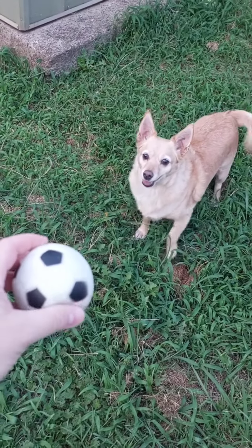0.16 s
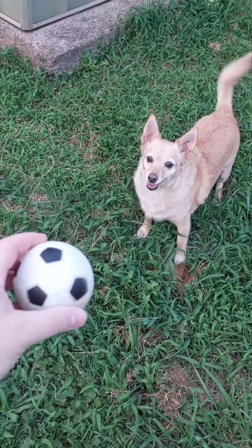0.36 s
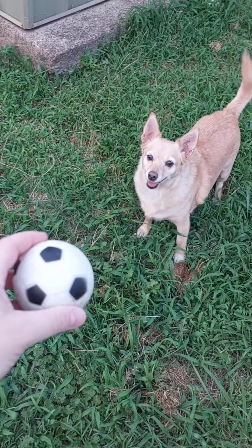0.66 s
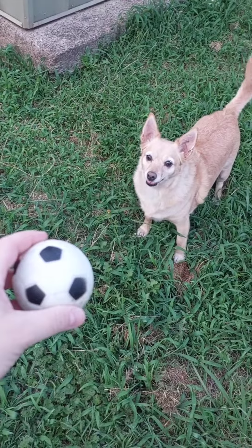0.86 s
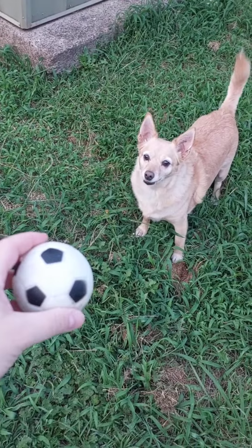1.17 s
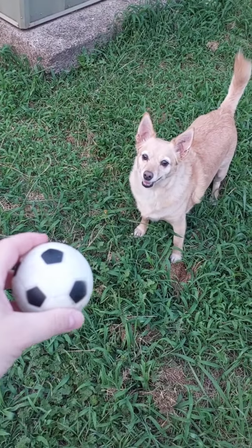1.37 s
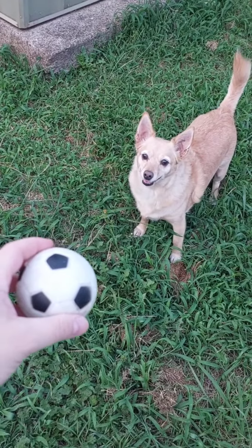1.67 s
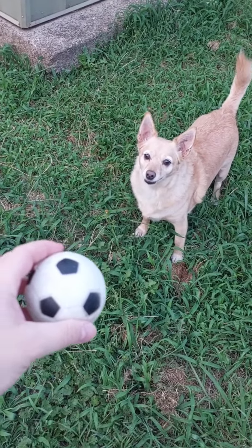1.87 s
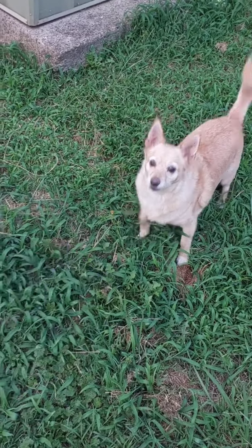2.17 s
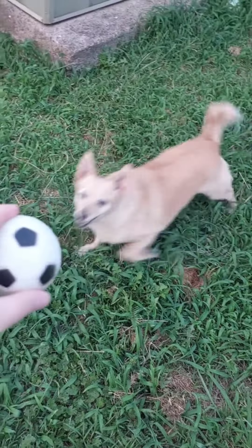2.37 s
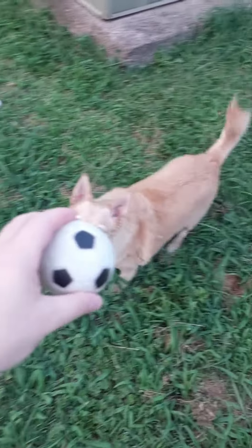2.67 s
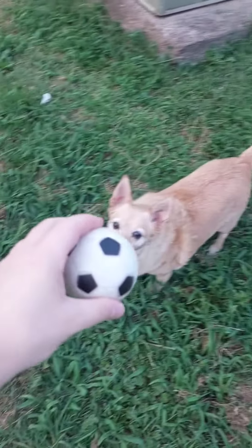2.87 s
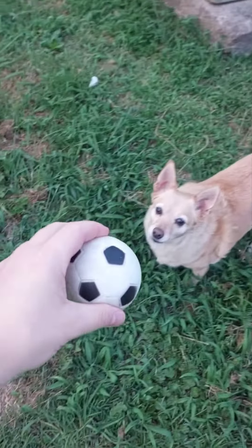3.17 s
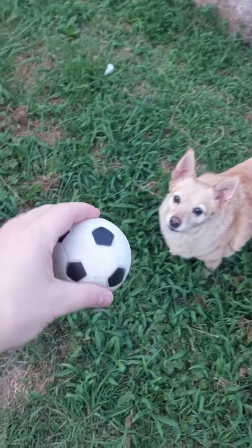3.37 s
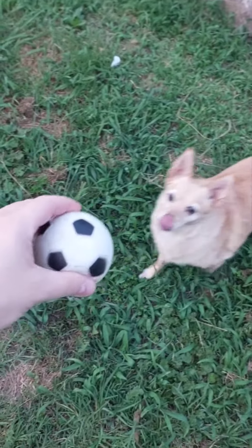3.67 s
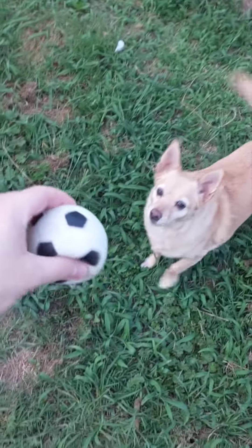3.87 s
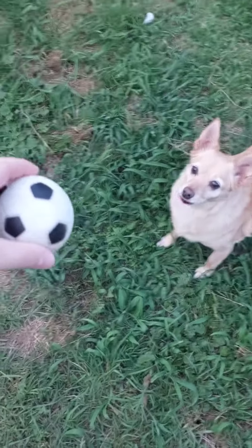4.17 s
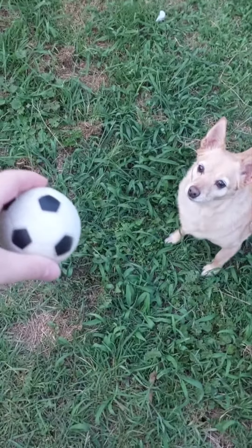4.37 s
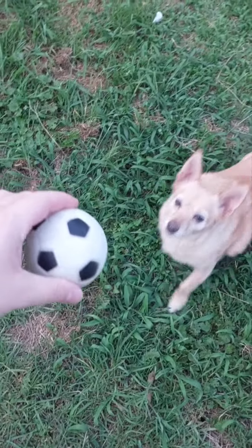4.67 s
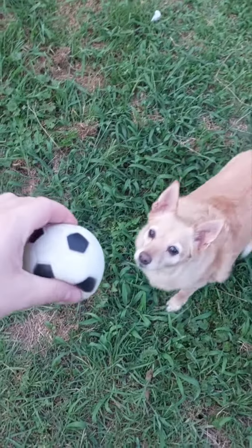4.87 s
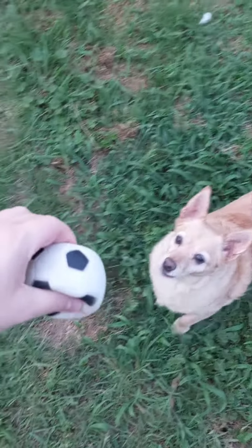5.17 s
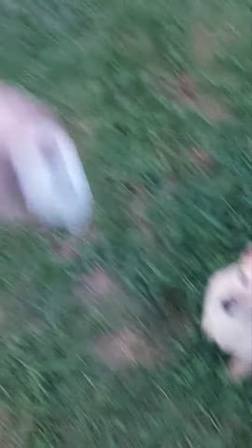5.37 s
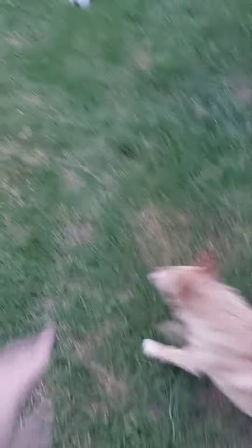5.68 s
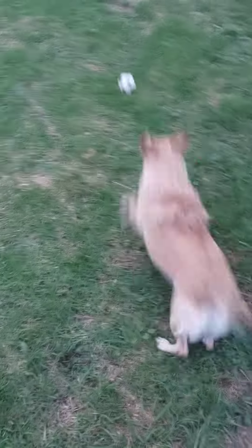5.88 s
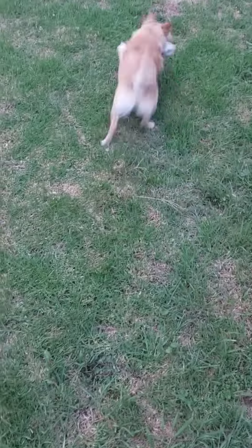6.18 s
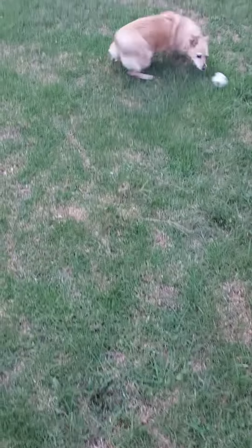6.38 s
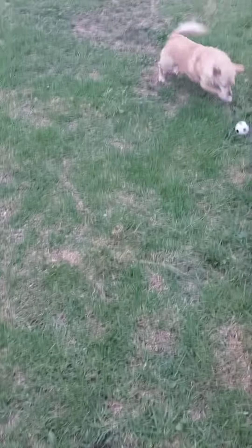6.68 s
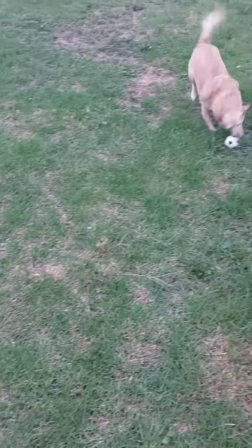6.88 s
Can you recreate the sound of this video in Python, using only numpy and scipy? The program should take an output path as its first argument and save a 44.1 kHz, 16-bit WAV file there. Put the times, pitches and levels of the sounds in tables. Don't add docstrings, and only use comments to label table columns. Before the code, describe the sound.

A hand squeezes a rubber squeaky ball close by in three bursts of sharp squeaks, over soft wind and birds, then a dog scampers through grass.

```python
import sys
import numpy as np
from scipy import signal
from scipy.fft import rfft, irfft
from scipy.io import wavfile
from scipy.ndimage import uniform_filter1d

SR = 44100
rng = np.random.default_rng(int(sys.argv[2]) if len(sys.argv) > 2 else 0)


def decibels_to_gain(level_db):
    exponent = np.asarray(level_db, float) / 20
    return 10 ** exponent


def to_wav(s):
    ch = np.atleast_2d(s).T
    pcm = np.round(np.clip(ch, -1, 1) * 32767)
    wavfile.write(sys.argv[1], SR, pcm.astype(np.int16))


N = 310023

# t/s, level/dB
WIND = [(0, -2.5), (.56, -8.5), (.95, -3), (1.2, -9), (1.66, 1.5), (2.05, -3), (2.4, 4.5), (2.65, -0.5),
        (3.0, 4.5), (3.3, -4), (3.6, 3.5), (4.35, -9), (4.67, -0.5), (4.85, -2), (5.6, 3.5), (6.2, -5),
        (6.56, 1), (7.03, -4.5)]
# t/s, level/dB
STIR = [(0, 1), (.56, -2), (.76, 2.5), (1.24, -3.5), (1.54, 5.5), (1.8, 4.5), (2.05, -4.5), (2.3, 6),
        (2.55, 6), (3.12, 3.5), (3.36, -7), (3.7, 0.5), (4.45, 0), (4.67, -4), (4.9, 1.5), (5.72, 2.5),
        (6.15, -4), (7.03, 4)]
# f/Hz, density/dB per Hz
RUMBLE = [(22, -56), (31, -26), (38, -6.5), (50, 0), (75, -0.5), (100, -9), (150, -7), (170, -14.5),
          (280, -12), (350, -18.5), (500, -21.5), (700, -40.5)]
BREEZE = [(250, -43.5), (500, -6.5), (800, -5.5), (1300, -6), (2000, -6), (3200, -54.5)]
LEAVES = [(4200, -52.5), (6200, 0), (7500, 1.5), (8700, -6.5), (10500, -7), (14000, -47)]
BIRDS = [(1300, -58), (2100, -8.5), (2800, -2.5), (3400, -7), (4200, -5), (5000, -4), (6000, -11),
         (7800, -45)]
GRASS = [(7500, -47.5), (10000, -15), (11300, -3.5), (13000, -7.5), (15000, -7.5), (16000, -26.5)]
# f/Hz, likeness/0-1
LIKENESS = [(60, 0.91), (150, 0.93), (290, 0.93), (640, 0.27), (1400, 0.017)]
# f/Hz, level/dB
BALANCE = [(60, -1.5), (200, -0.5), (700, -7.5), (2400, 1), (4400, 1), (8100, -1), (15000, -10)]
# t/s, length/s,
# start f/Hz, end f/Hz, level/dB
WHISTLES = [(0.438, 0.067, 3100, 2800, -53.5), (0.681, 0.056, 4560, 4800, -47),
            (0.716, 0.05, 2800, 3000, -59.5), (0.86, 0.21, 950, 1074, -66.5),
            (1.037, 0.16, 1600, 1760, -63.5), (1.25, 0.15, 1204, 1400, -58.5),
            (1.331, 0.16, 1380, 1400, -56.5), (1.5, 0.034, 2710, 3000, -47),
            (2.334, 0.06, 4800, 5130, -38.5), (2.422, 0.05, 4000, 4500, -42),
            (2.546, 0.074, 6000, 5000, -43), (4.106, 0.16, 1300, 1340, -59),
            (3.74, 0.16, 5070, 4450, -45.5), (6.574, 0.068, 4080, 4000, -47.5),
            (6.618, 0.076, 4000, 3750, -46), (6.652, 0.068, 6040, 5400, -52.5),
            (2.93, 0.046, 4350, 4400, -44), (2.96, 0.033, 4500, 5200, -41), (2.498, 0.065, 5200, 4300, -45),
            (2.56, 0.058, 4000, 3700, -46), (2.627, .1, 4300, 4500, -52), (2.84, 0.074, 4700, 5100, -46),
            (2.87, .05, 3900, 3950, -48), (3.01, .05, 5200, 5500, -55), (3.1, .08, 5070, 5400, -55),
            (2.415, .05, 7600, 8000, -52), (3.634, 0.048, 5200, 4800, -47), (5.045, .045, 5400, 5100, -46),
            (6.836, 0.2, 4300, 4230, -59), (6.914, 0.14, 4300, 3820, -50)]
# middle t/s, half length/s, level/dB
RUSTLES = [(0.75, 0.3, -79), (1.199, .15, -86), (1.492, 0.094, -65.5), (1.772, .05, -70.5),
           (2.204, 0.13, -71), (2.498, 0.22, -59.5), (3.23, 0.049, -75), (3.691, 0.15, -60),
           (4.817, 0.15, -73.5), (5.095, 0.09, -62.5), (5.709, 0.073, -57), (5.947, 0.22, -64),
           (6.556, 0.28, -70.5), (6.954, 0.12, -80.5)]
# t/s, peak level/dB, length/s
STEPS = [(2.412, -33.5, 0.0438), (5.693, -35.5, 0.045), (5.7274, -33.5, 0.045), (5.864, -33, 0.036),
         (5.935, -41, 0.037), (6.023, -39, 0.041), (6.094, -31.5, 0.023), (6.121, -47, 0.045),
         (6.208, -42.5, 0.045), (6.326, -37, 0.066), (6.416, -50.5, 0.033), (6.52, -41.5, 0.088)]
# t/s, peak level/dB, f/Hz, ring/ms
SNAPS = [(.87, -44, 13500, .4), (2.424, -32, 11500, .4), (2.462, -54, 15000, .4), (2.509, -49, 14700, .4),
         (2.551, -28.5, 12100, 0.4), (2.552, -26, 14600, 0.35), (2.729, -30, 13860, 0.27),
         (3.46, -51, 13000, .4), (5.692, -37, 1100, 0.55), (5.709, -30, 1210, 0.52),
         (6.096, -33, 2700, 0.75), (6.114, -37, 2720, 0.39), (6.356, -31.5, 4000, 0.15)]
# t/s, peak level/dB, f/Hz, length/s, left level/dB
BUMPS = [(2.354, -29, 67, 0.0095, -34), (2.399, -42, 560, 0.0044, -11), (2.403, -59, 1000, 0.003, 2),
         (5.435, -32.5, 60.4, 0.013, -33), (5.575, -37, 50, 0.015, -21)]
# t/s, reed f/Hz, pressure level/dB
SQUEEZES = [
    [(0, 1938, -8.5), (.011, 2655, -9.5), (.02, 2947, -9), (.033, 3757, -22.5), (.05, 3560, -16),
     (.068, 2517, -7.5), (.077, 1783, -20), (.09, 1066, -15.5), (.103, 902, -38.5)],
    [(3.825, 977, -21.5), (3.865, 1491, -12), (3.879, 1818, -11.5), (3.889, 2182, -13),
     (3.897, 2768, -11.5), (3.921, 3614, -15.5), (3.937, 2773, -14), (3.958, 1216, -15.5),
     (3.974, 935, -33)],
    [(5.171, 983, -21.5), (5.213, 1339, -11.5), (5.237, 1568, -12), (5.254, 1858, -10), (5.27, 1890, -7.5),
     (5.286, 1856, -12.5), (5.296, 1640, -11), (5.32, 1145, -16.5), (5.348, 910, -26.5)],
]
# start t/s, length/s, top f/Hz, end f/Hz, pressure level/dB
PRESSES = [
    (3.557, 0.086, 1032, 876, -20.5),
    (4.968, 0.084, 1067, 880, -19.5),
]
# top at share of length/0-1, start pitch drop/0-1, fall bend, sag/dB per s,
# start level/dB, end level/dB, stall/s
PRESS_SHAPE = (0.43, .04, 1, -39, -5, -14, 0.05)
# t/s, reed f/Hz, suction level/dB
REFILLS = [
    [(0.143, 1067, -37), (0.149, 1045, -32.5), (0.165, 1067, -33.5), (0.259, 964, -37.5),
     (0.307, 912, -40.5), (0.322, 900, -54)],
    [(3.991, 1076, -31), (3.995, 1084, -33.5), (4.035, 1069, -32.5), (4.055, 1023, -34),
     (4.141, 915.5, -39.5), (4.162, 892, -53)],
    [(5.376, 1071, -35), (5.382, 1077, -33), (5.412, 1123, -29), (5.438, 1100, -30), (5.596, 940.4, -43.5),
     (5.634, 929, -48.5), (5.692, 900, -48.5), (5.712, 900, -59)],
]
# left level/dB, pipe level/dB, left lag/ms, treble level/dB
GRIPS = [(3, 1, 0.028, 2.5), (1.9, 6, 0.0038, 3.5), (-2, 0.5, 0.028, 0), (3, 7, -0.073, -9.5),
         (-2, 4.5, 0.0063, -5), (0.1, -10, .011, 0.7), (2.5, 4, -0.037, -3), (2, 6, 0.015, 0)]
# left level/dB x 2, right level/dB x 2
SHADES = [(1.5, -1, 3.5, 7.3), (2.5, -7.5, 1, 7.5), (-2.5, -1.5, -2.5, 8.1), (-2.5, -9, 5.5, 2.9),
          (-0.5, -10.5, 2, 1.3), (-1, 0.5, -0.5, 4.5), (-5.5, -5.5, 2, 0.58), (-6.5, -1.5, -7, 8)]
SHADE_HZ = [1000, 2100, 4800, 10000, 14000]
# f/Hz, left level/dB, right level/dB
PUSH = [(455, -27, -33.5), (1000, -13, -10), (2030, -14, -10.5), (3000, -18, -16), (4000, -6.5, -12),
        (5200, -7, -12), (5930, -5.5, -13.5), (7660, -13.5, 2.5), (9340, -15.5, -6.5), (9340, -13.5, -12),
        (11000, -22.5, -7), (12400, -34.5, -17.5), (13600, -36.5, -7.5), (16000, -54.5, -17)]
# f/Hz, left level/dB, right level/dB
SUCK = [(472, -39, -42), (900, -7.5, -7.5), (2120, -9.5, -4.5), (3000, -10.5, -8.5), (4300, -9, -10.5),
        (5070, -8, -17), (6900, -43.5, -20.5), (7426, -13, 0), (8700, -16, -4.5), (10400, -18, -5),
        (11500, -17.5, -5.5), (13000, -21, -8.5), (14500, -26, -15), (16000, -46.5, -23)]
# f/Hz, half width/Hz, pushed-out level/dB, sucked-in level/dB
GAPS = [(2316, 73, -6.5, -11), (3900, 200, -0.5, -5), (10280, 150, -3.5, -1), (12800, 300, -9, -2.5),
        (14900, 2700, 3.5, 1.5)]

GENTLE_ROUGH, LOOSE = 0.045, 0.01


def evened(x):
    return x / np.sqrt(np.mean(x ** 2) + 1e-20)


def read(points, hz, column=1):
    table = np.transpose(points)
    return np.interp(np.log(hz + 1), np.log(table[0] + 1), table[column])


def add(mix, s, sound):
    part = mix[:, round(s * SR):][:, :sound.shape[-1]]
    part += sound[..., :part.shape[1]]


def wander(count, length, per_s):
    knots = rng.standard_normal((count, 40))
    at = np.arange(length) / SR * per_s
    return np.array([np.interp(at, np.arange(40), row) for row in knots])


def follow(curve, share):
    return decibels_to_gain(share * np.interp(np.arange(N) / SR, *np.transpose(curve)))


def wash(shape, patchy_db, size=512):
    hop = size // 4
    hz = np.fft.rfftfreq(size, 1 / SR)
    a, b, c, d, patches = rng.standard_normal((N // hop + 5, len(hz), 5), dtype=np.float32).T
    patches = uniform_filter1d(patches, size=4, axis=0)
    patches = evened(uniform_filter1d(patches, size=40, axis=1))
    same = np.clip(read(LIKENESS, hz), 0, 1)[:, None]
    left = a + 1j * b
    right = same * left + np.sqrt(1 - same ** 2) * (c + 1j * d)
    lean_db = read(BALANCE, hz) * np.array([[0.5], [-0.5]])
    z = np.array([left, right]) * decibels_to_gain((read(shape, hz) + lean_db)[..., None] + patchy_db * patches)
    return evened(signal.istft(z, nperseg=size, noverlap=size - hop)[1][:, :N])


def air():
    rumble = decibels_to_gain(-54) * follow(WIND, 0.89) * wash(RUMBLE, patchy_db=0.68, size=2048)
    breeze_gain = decibels_to_gain(-63.5) * follow(WIND, 0.77) * follow(STIR, 0.6)
    return rumble + breeze_gain * wash(BREEZE, patchy_db=3.5)


def whistle(length_s, start_hz, end_hz, lag_turns):
    turns = np.cumsum(np.linspace(start_hz, end_hz, round(length_s * SR))) / SR
    return np.hanning(len(turns)) * np.sin(2 * np.pi * np.array([turns - lag_turns, turns]))


def birds():
    twitter, near = np.zeros((2, 2, N))
    for s, place, glide, length, size, lag in rng.random((1000, 6)):
        hz = 2200 + 3600 * place
        note = whistle(0.0285 + 0.088 * length, hz, hz * (0.93 + 0.16 * glide), lag)
        add(twitter, s * N / SR, decibels_to_gain(read(BIRDS, hz) + 9 * size) * note)
    for s, length_s, start_hz, end_hz, db in WHISTLES:
        flutter = wander(count=1, length=round(length_s * SR), per_s=150)[0]
        flutter_db = min(start_hz / 1200, 4) * flutter
        add(near, s, decibels_to_gain(db - 3 + flutter_db) * whistle(length_s, start_hz, end_hz, 0.2))
    far = evened(twitter) + decibels_to_gain(4.5) * wash(BIRDS, patchy_db=4.0)
    return decibels_to_gain(-60.5) * follow(STIR, 1) * far + near


def rustle():
    still_db = -94.5
    t = np.arange(0, N + 64, 64) / SR
    power = sum(decibels_to_gain(2 * db) * np.exp(-((t - s) / half_s) ** 2 * 2) for s, half_s, db in RUSTLES)
    return np.interp(np.arange(N) / SR, t, np.sqrt(power + decibels_to_gain(2 * still_db)))


def foliage():
    brushed = rustle()
    leaf_gain = decibels_to_gain(-69) * follow(STIR, 1.2) + decibels_to_gain(-1.5) * brushed
    leaves = leaf_gain * wash(LEAVES, patchy_db=5.0, size=256)
    return leaves + decibels_to_gain(7.0) * brushed * wash(GRASS, patchy_db=4.5, size=128)


def dog():
    out = np.zeros((2, N))
    bright = signal.butter(1, [1500, 17000], "band", fs=SR)
    for s, db, length_s in STEPS:
        crackle_db = 4.5 * np.minimum(rng.exponential(1, 4000), 4)
        crackle = rng.standard_normal((2, 4000)) * decibels_to_gain(crackle_db)
        u = np.arange(4000) / SR / length_s
        envelope = np.minimum(3 * u, 1) * np.exp(-u ** 2)
        add(out, s, decibels_to_gain(db - 13.0) * evened(signal.lfilter(*bright, crackle)) * envelope)
    t = np.arange(200) / SR
    for s, db, hz, ring_ms in SNAPS:
        sides = decibels_to_gain(db + np.array([[-3], [1.5]]))
        add(out, s, sides * np.sin(2 * np.pi * hz * t) * np.exp(-1000 * t / ring_ms))
    t = np.arange(9000) / SR
    for s, db, hz, length_s, left_db in BUMPS:
        envelope = -t / length_s * np.exp(1 - t / length_s)
        add(out, s, decibels_to_gain([[db + left_db], [db]]) * np.sin(2 * np.pi * hz * t) * envelope)
    return out


def yard(x):
    t = np.arange(SR // 4) / SR
    sign = rng.choice([-1., 1.], (2, len(t)))
    sparse = rng.random((2, len(t))) < 0.05
    taps = sign * sparse * (t > 0.004) * decibels_to_gain(-60 * t / 0.16)
    return signal.fftconvolve(x, taps / np.linalg.norm(taps[0]), axes=1)[:, :N]


def flow_curves(rows, smooth):
    s, hz, db = np.transpose(rows)
    t = np.arange(s[0], s[-1], 1 / SR)
    hz, db = (uniform_filter1d(np.interp(t, s, c), size=smooth, mode="nearest") for c in (hz, db))
    return t, hz, db


def refill(rows):
    t, hz, db = flow_curves(rows, 400)
    return t, hz, db + 5.5, GENTLE_ROUGH, LOOSE


def press(row):
    start_s, length_s, top_hz, end_hz, db = row
    top, below, bend, sag_db, start_db, end_db, stall_s = PRESS_SHAPE
    rise_s = 0.015
    t = np.arange(0, length_s, 1 / SR)
    before = np.maximum(1 - t / length_s / top, 0)
    after = np.maximum(t / length_s - top, 0) / (1 - top)
    hz = top_hz * (1 - below * before ** 2) - (top_hz - end_hz) * after ** bend
    hz = uniform_filter1d(hz, size=600, mode="nearest")
    db = db + start_db * np.exp(-t / rise_s) + sag_db * after * length_s
    db = db + end_db * np.maximum(1 - (length_s - t) / stall_s, 0)
    return start_s + t, hz, db, GENTLE_ROUGH, LOOSE


def squeeze(rows):
    lock_hz, lock_pull = 7750, 0.85
    rattle_s, rattle_half_s = 5.269, 0.021
    t, hz, db = flow_curves(rows, 160)
    fit = lock_hz / hz
    pull = lock_pull * np.exp(-(fit / 8) ** 2) * np.sin(2 * np.pi * fit) / (2 * np.pi)
    hz = lock_hz / (fit - pull)
    octaves_per_s = abs(np.gradient(np.log2(hz))) * SR
    caught = np.exp(-((t - rattle_s) / rattle_half_s) ** 4)
    rough = 0.1 + 0.002 * octaves_per_s + 0.25 * caught
    return t, hz, db, rough, 0.06 + 0.55 * caught


def causal(db):
    log_gain = np.log(decibels_to_gain(np.r_[db, db[-2:0:-1]]))
    return np.fft.ifft(np.exp(log_gain - 1j * signal.hilbert(log_gain).imag)).real[:len(db) // 2]


def reed(flow):
    t, hz, pressure_db, rough, wobble = flow
    start, end = t[[0, -1]]
    edge_s = 0.005
    rough = rough + 0.3 * (np.exp((start - t) / edge_s) + np.exp((t - end) / edge_s))
    shake = evened(uniform_filter1d(rng.standard_normal(len(t)), size=60))
    turns = np.cumsum(hz * (1 + 0.023 * rough * shake)) / SR
    k = np.arange(1, 19)[:, None]
    curves = np.array([wander(count=18, length=len(t), per_s=50) for _ in range(2)])
    sway_db = (0.8 + 0.25 * k) * (1 + 6 * np.minimum(wobble, 0.09)) * curves
    soft_db = -3.4 * (k - 1) * np.log2(np.maximum(hz / 1100, 1))
    soft_db = soft_db + 0.045 * (k - 1) * (pressure_db - pressure_db.max())
    shift = 0.22 * wobble * np.minimum(k, 5) ** 2 * np.sin(2 * np.pi * turns / 4) + 0.05 * k ** 2
    partials = np.cos(2 * np.pi * k * turns + shift) * (k * hz < 16000)
    pulses = (partials * decibels_to_gain(soft_db + sway_db[0] + 0.1 * sway_db)).sum(1)
    beat = np.cos(2 * np.pi * turns / 4) + 0.5 * np.sin(2 * np.pi * turns / 2)
    pulses *= 1 + 0.7 * wobble * beat
    hiss = rng.standard_normal(len(t)) + 1.5 * rng.standard_normal((2, len(t)))
    puffs = (0.732 + np.exp(-(turns % 1) / 0.25)) * hiss
    puffs = evened(signal.lfilter([1, -0.5], 1, puffs))
    drive = pulses * (hz / 1000) ** 0.5 + 1.7 * rough * puffs
    fade_in = np.clip((t - start) / 0.004 + (start == 0), 0, 1)
    fade_out = np.clip((end - t) / 0.0046, 0, 1)
    return drive * decibels_to_gain(pressure_db + 1.3) * fade_in * fade_out


def squeak(flow, colour, grip, shade):
    t, hz = flow[:2]
    left_db, pipe_db, lag_ms, treble_db = grip
    f = np.fft.rfftfreq(2048, 1 / SR)
    pipe_hz = 7790 if hz.max() > 1500 else 7170
    body_db = pipe_db / (1 + ((f - pipe_hz) / 320) ** 2)
    for gap_hz, half_hz, push_db, suck_db in GAPS:
        gap_db = push_db if colour is PUSH else suck_db
        body_db = body_db + gap_db / (1 + ((f - gap_hz) / half_hz) ** 2)
    left_shade_db = np.interp(f, SHADE_HZ, [0, *shade[:2], 0, treble_db])
    right_shade_db = np.interp(f, SHADE_HZ, [0, *shade[2:], 0, treble_db])
    left = causal(read(colour, f, column=1) + left_db + left_shade_db + body_db)
    right = causal(read(colour, f, column=2) + right_shade_db + body_db)
    delay_s = np.array([[lag_ms], [0]]) / 1000 + 8 / SR
    paths = rfft(np.array([left, right]), 1024) * np.exp(-2j * np.pi * f[::2] * delay_s)
    return t[0], signal.fftconvolve(reed(flow), irfft(paths), axes=1)


def rubber_ball():
    ball = np.zeros((2, N))
    flows = [(squeeze(rows), PUSH) for rows in SQUEEZES]
    flows += [(press(row), PUSH) for row in PRESSES]
    flows += [(refill(rows), SUCK) for rows in REFILLS]
    for (flow, colour), grip, shade in zip(flows, GRIPS, SHADES):
        add(ball, *squeak(flow, colour, grip, shade))
    lawn_echo = decibels_to_gain(-14.5) * np.roll(ball, round(0.0068 * SR), axis=1)
    return ball + decibels_to_gain(-15) * yard(ball) + lawn_echo


def scene():
    return air() + birds() + foliage() + dog() + rubber_ball()


def top_cut(x):
    return signal.sosfilt(signal.butter(12, 16040, fs=SR, output="sos"), x)


def record(dry):
    held = 0.88 * np.tanh(dry / 0.88)
    held = signal.sosfilt(signal.butter(3, 34, "high", fs=SR, output="sos"), held)
    hz, _, z = signal.stft(held, SR, nperseg=1024, noverlap=768)
    band = uniform_filter1d((abs(z) ** 2).mean(0), size=4, axis=0)
    band = uniform_filter1d(band, size=8, axis=1)
    nearby = np.exp(uniform_filter1d(np.log(band + 1e-20), size=50, axis=0))
    margin_db = np.interp(hz, [1000, 1600, 3000, 5500, 9000, 14000, 16000],
                          [-40, -24, -16, -10, -5.5, -5, -2])[:, None]
    faint = np.interp(hz, [12000, 13000, 15000, 16000], [0, 3e-11, 8e-11, 2e-10])[:, None]
    threshold = np.maximum(np.minimum(nearby * decibels_to_gain(margin_db), 1e-7), faint)
    z = z * np.where(band < threshold, 0.06, 1) * (hz < 16050)[:, None]
    mix = signal.istft(z, SR, nperseg=1024, noverlap=768)[1][:, :N]
    return top_cut(mix)


dry = scene()
out = record(dry)
to_wav(out)
```